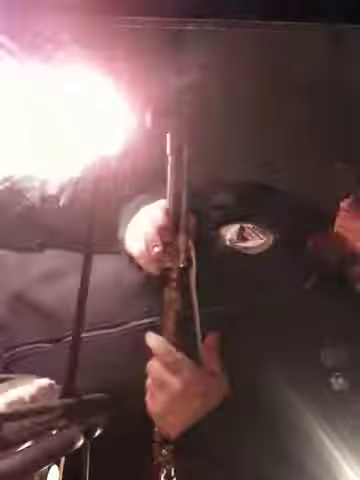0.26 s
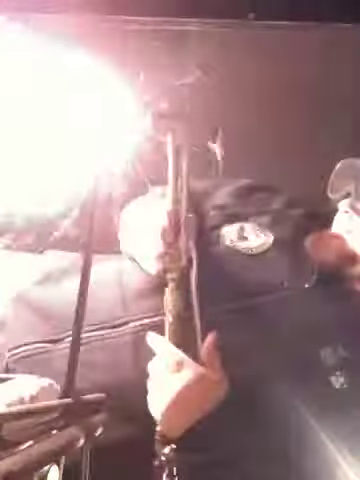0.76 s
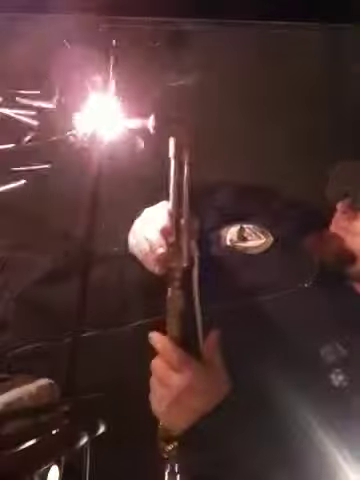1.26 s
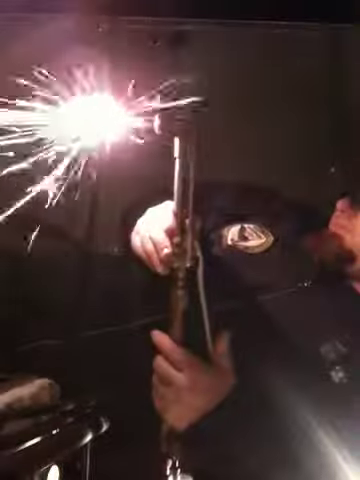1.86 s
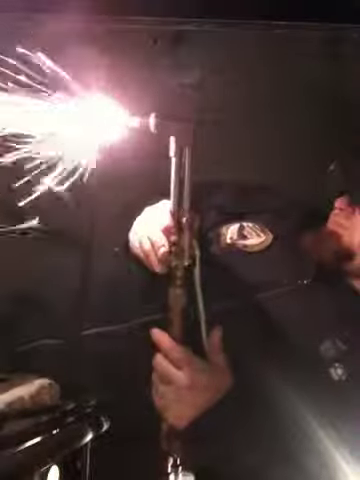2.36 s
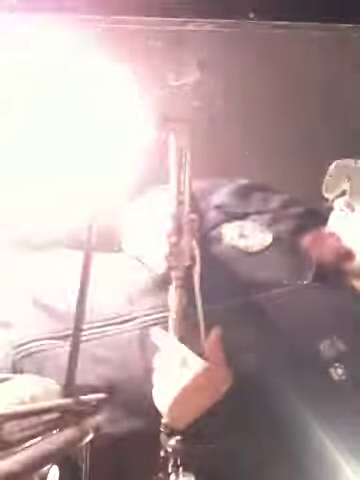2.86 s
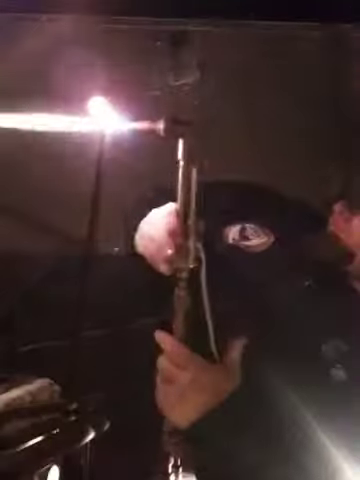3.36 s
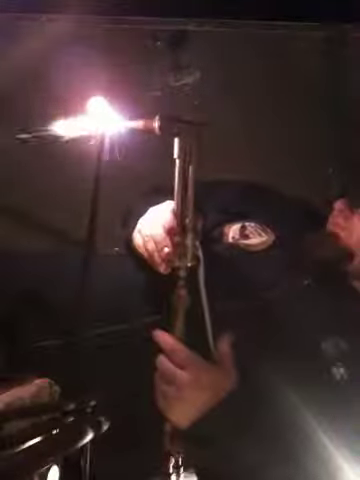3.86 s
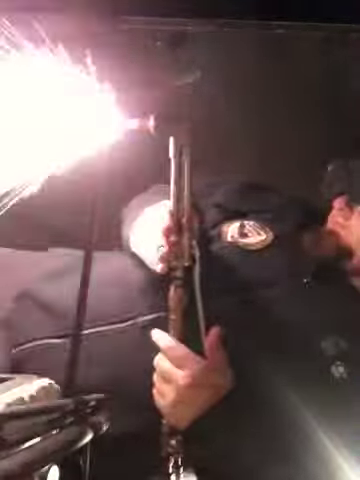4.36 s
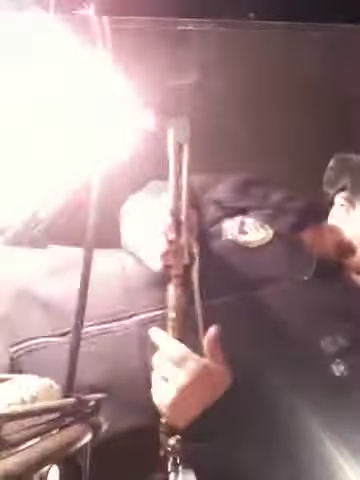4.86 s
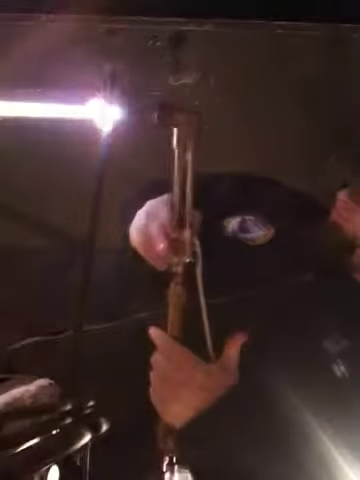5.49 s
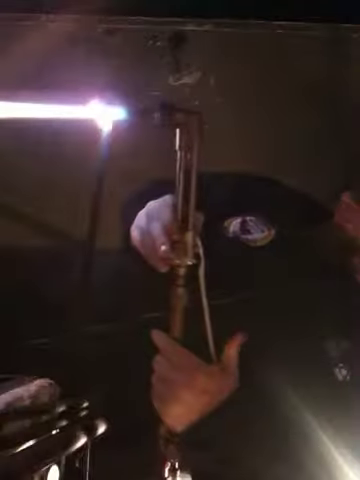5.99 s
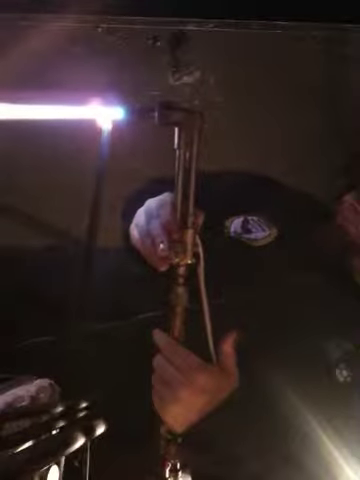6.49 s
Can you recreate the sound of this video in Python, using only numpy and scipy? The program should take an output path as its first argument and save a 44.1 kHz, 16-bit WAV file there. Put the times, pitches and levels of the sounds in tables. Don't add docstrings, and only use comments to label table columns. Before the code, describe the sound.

A gas torch about a metre from a phone microphone cuts metal in a small, hard-walled shop. Rushing, crackly jets of high hiss start and stop suddenly, leaving a soft low flame roar in the gaps. The final long jet breaks through; metal drops with a sharp clank and dull floor thud, sizzles briefly and bounces, then only the loose breathy flame and faint air hiss remain.

```python
import sys
import numpy as np
from scipy import signal
from scipy.fft import rfft, irfft, next_fast_len
from scipy.io import wavfile
from scipy.ndimage import uniform_filter1d

SR = 44100
rng = np.random.default_rng(int(sys.argv[2]) if len(sys.argv) > 2 else 0)


def digitize_waveform(pressure):
    field = np.atleast_2d(pressure).T
    bounded = np.clip(field, -1, 1)
    quanta = np.round(bounded * 32767).astype(np.int16)
    wavfile.write(sys.argv[1], SR, quanta)


def boost(x):
    u = np.asarray(x, float) / 20
    return 10 ** u


N = 296793
PAD_N = next_fast_len(N)
TIME_S = np.arange(N) / SR
HZ = np.fft.rfftfreq(PAD_N, 1 / SR) + 1

# f/Hz, density/dB
HUSH_COLOUR = [(1760, -30), (3000, -1), (3590, -4), (3760, -21), (4410, -19), (8290, -16), (15500, -26)]
# f/Hz, width/Hz, lift or dip/dB
SHOP_MODES = [(250, 26, 4.5), (292.5, 60, -12), (355, 34, 7), (430, 57, -4), (567, 78, 4.5), (689, 38, 7.5),
              (750, 44, -6.5), (842, 30, -4.5), (1077, 160, 4.5), (1139, 19, 3.5), (1266, 130, -1),
              (1705, 23, 7), (1803, 40, 0), (1585, 26, 8.5), (2036, 34, -5.5), (2130, 130, 3.5),
              (2401, 115, -10.5), (2860, 560, 1.5), (3130, 110, 1), (3374, 86, 4.5), (3890, 220, 3),
              (4600, 60, -2), (4950, 150, 3), (6230, 1100, 2), (7240, 130, 3.5), (10700, 200, 1),
              (12900, 490, 1), (13700, 900, -1), (5830, 150, -2)]
# f/Hz, width/Hz, lift or dip/dB
FREE_MODES = [(615, 76, 4.5), (677, 35, -5), (795, 110, 5.5), (880, 50, -8), (990, 18, 2.5),
              (1106, 140, -5), (1235, 37, 3.5), (1510, 50, 2), (1600, 90, -3.5), (1790, 130, 7),
              (2260, 80, -2), (2367, 110, 14), (2530, 60, -8)]
# t/s, roar on the work/dB
FLAME_ROAR = [(0.0, -51), (0.4, -53), (0.72, -61), (1.22, -55.5), (1.42, -51.5), (2.0, -57.5),
              (2.97, -55.5), (3.39, -42), (3.53, -50.5), (3.9, -45), (4.02, -48), (4.6, -49), (4.72, -56.5),
              (4.95, -50), (5.47, -43), (5.6, -53), (6.45, -48), (6.73, -52)]
# f/Hz, density/dB
FLAME_COLOUR = [(15, -73), (25, -37), (129, -16), (229, -1), (288, -6), (355, -4.5), (456, -6), (1080, -1),
                (2400, -10), (3120, -53), (5280, -120)]
# t/s, roar/dB, rumble/dB
FLAME_PUFFS = [(.68, 3, 5), (1.93, 2.5, 2), (1.05, -2.5, 6), (2.34, 5, 0), (2.93, 0, 6.5), (3.45, 0, 6),
               (3.56, 4.5, 3), (4.1, 3.5, 8), (4.52, 6, 3), (4.93, 4, 2), (5.16, 0.5, 11), (5.51, 4.5, 7)]
# t/s, peak level/dB, thud/dB, clank/dB, ring/dB
CONTACTS = [
    (5.5824, -27.5, -9, -12, -10.5),
    (5.5924, -32, -13, -5, -16),
    (5.612, -42.5, -1.5, -20, -10),
    (5.623, -44, 0, -3.5, -7.5),
    (5.8663, -48, -10, -11, -8),
    (5.8850, -56, -8, -14, -6),
    (5.9968, -51, -7, -13, -6),
    (6.5846, -62, 10, -5, -18),
]
# f/Hz, level/dB, t60/s
THUD_MODES = [(217, 5.5, 0.05), (334, 1, 0.12), (590, 7.5, 0.03), (1370, -6, 0.062)]
# f/Hz, level/dB, t60/s
CLANK_MODES = [(3070, -0.5, 0.027), (3300, 0, 0.035), (4600, -8, .02)]
# f/Hz, level/dB, t60/s
RING_MODES = [(7000, -2, 0.044), (7370, 2.5, 0.025), (7950, -11, .02), (9300, -15, .02)]
# t/s, jet flow/dB, aim at the phone/dB
LEVER_SQUEEZES = [
    [(-0.005, -43.5, -10), (0.07, -40, 2.5), (0.36, -41.5, -1), (0.44, -48, 3), (0.645, -47.5, 5),
     (0.75, -50, 2.5), (0.95, -48, 1), (1.1, -50, 1.5), (1.27, -48.5, 6.5)],
    [(1.26, -44.5, 6), (1.45, -45, 9), (1.68, -43, 5.5), (1.745, -41.5, 6.5), (1.81, -47.5, 4.5),
     (1.955, -46, -4.5)],
    [(2.254, -42, -5), (2.34, -42, 3.5), (2.4, -48.5, -1.5), (2.5, -46, 3), (2.6, -45.5, 1),
     (3.07, -49.5, 2.5), (3.16, -38.5, -2.5), (3.29, -39.5, 1.5), (3.42, -42.5, -1.5)],
    [(4.04, -43.5, -1.5), (4.33, -42, 1), (4.57, -42.5, -1.5), (4.68, -51, 2), (4.84, -44.5, 1.5),
     (5.11, -45, 1.5), (5.27, -38.5, 0.5), (5.42, -38.5, 0), (5.49, -41, -1)],
]
# f/Hz, density/dB
JET_COLOUR = [(1180, -38), (2000, -6.5), (2390, 1), (2750, 0.5), (3070, -4.5), (4920, -3), (5840, -4),
              (6520, -0.5), (8010, -1.5), (15500, -4)]
# level/dB, aim follow/(dB/dB), flame roar follow/(dB/dB)
JET_LAYERS = [
    (-6.5, -.5, .3),
    (-3, .5, 0.1),
    (0.5, 0.7, 0),
    (0.5, 1, 0),
    (-2.5, 0.75, -0.24),
]
# t/s, low f/Hz, high f/Hz, level/dB
WIDE_PATCHES = [(0.126, 4650, 5680, -41), (0.217, 9650, 11020, -48), (0.31, 12400, 14470, -43),
                (0.96, 5170, 6290, -53), (1.1, 4570, 5680, -55), (1.101, 7670, 9650, -54),
                (1.379, 11020, 12400, -42), (2.329, 4650, 5680, -44), (2.447, 11020, 12490, -54),
                (2.449, 6890, 8960, -49), (2.631, 13780, 15160, -51), (2.632, 4650, 5680, -49),
                (2.727, 14470, 15850, -52), (2.742, 6200, 8270, -48), (2.935, 5080, 6890, -50),
                (4.304, 6890, 8270, -45), (4.373, 5680, 6890, -46), (4.739, 4570, 8350, -51),
                (4.796, 4220, 5250, -49), (6.138, 4220, 5250, -70)]

HUSH_DB, HUSH_DUCK = -74, .4
WALL_T60_S, WALL_DB = (.15, .3), (-10, -12)
FREE_S, PUFF_S = 5.56, 0.038
ROAR_MID_DB = -50
RUMBLE_DB, RUMBLE_FOLLOWS, RUMBLE_FREE_DB, RUMBLE_DUCK_DB = -59, 0.42, 7, -3.5
EDGE_DB, EDGE_JET_DB, EDGE_FREE_DB = -8.5, 9.5, -2
DRAUGHT_DB, DRAUGHT_FREE_DB, DRAUGHT_DUCK, GUST_DB = -84, -0.5, 0.76, 5.5
SIZZLE_DB, SIZZLE_T60_S = -57, .4
OPEN_S, OPEN_CURVE, TOP_LATE_S, TOP_EARLY_S = 0.038, 0.75, .008, 0.016
SHUT_DB_PER_S = (400, 400, 330, 250)
BLEED_DB, BLEED_DB_PER_S = -33, 14.5
SCALE_DB, SCALE_T60_S = 5.5, 2.6
FRINGE_DB, FRINGE_FREE_DB = (-9, -16, -20.5, -30, -36, -52), -4.5


def colour(points):
    hz, db = np.transpose(points)
    return boost(np.interp(np.log(HZ), np.log(hz), db))


def slope(hz, order):
    return 1 / (1 + np.exp(np.clip(order * np.log(HZ / hz), -99, 99)))


def noise(gain, lo_hz, hi_hz, grit=0.):
    spit = boost(grit * rng.exponential(size=N))
    spectrum = rfft(rng.standard_normal(N) * spit, PAD_N) * gain
    inside = np.sum(abs(spectrum[(HZ > lo_hz) & (HZ < hi_hz)]) ** 2)
    return irfft(spectrum * PAD_N / np.sqrt(2 * inside), PAD_N)[:N]


def split(gain, edges_hz, order, grit=0.):
    cuts = [np.sqrt(a[1] * b[0]) for a, b in zip(edges_hz, edges_hz[1:])]
    below = [0, *(slope(hz, order) for hz in cuts), 1]
    bands = []
    for low, high, edges in zip(below, below[1:], edges_hz):
        share = np.clip(high - low, 0, 1)
        bands.append(noise(gain * np.sqrt(share), *edges, grit))
    return bands


def walk(rate):
    k = int(SR / rate)
    held = np.repeat(rng.standard_normal(N // k + 1), k)
    return uniform_filter1d(uniform_filter1d(held, k), k)[:N]


def play(table):
    s, *columns = np.transpose(table)
    return [np.interp(TIME_S, s, c) for c in columns]


def shop(modes):
    return boost(sum(db / (1 + (2 * (HZ - hz) / width) ** 2) for hz, width, db in modes))


def walls(x):
    t = np.arange(16384) / SR
    bright, dull = rng.standard_normal((2, len(t))) * (t > .002)
    bright = signal.sosfilt(signal.butter(2, 2500, "high", fs=SR, output="sos"), bright)
    dull = signal.sosfilt(signal.butter(2, (450, 2500), "band", fs=SR, output="sos"), dull)
    echo = np.zeros(len(t))
    for tail, t60, db in zip((bright, dull), WALL_T60_S, WALL_DB):
        tail = tail * np.exp(-np.log(1000) * t / t60)
        echo = echo + boost(db) * tail / np.sqrt(np.sum(tail ** 2))
    echo[0] = 1
    response = rfft(echo, PAD_N)
    response = response / np.sqrt(uniform_filter1d(abs(response) ** 2, size=900))
    return irfft(rfft(x, PAD_N) * response, PAD_N)[:N]


def hush():
    level_db = HUSH_DB - HUSH_DUCK * (play(FLAME_ROAR)[0] - ROAR_MID_DB) + 1.2 * walk(17)
    gain = colour(HUSH_COLOUR[:-1]) * np.sqrt(1 - slope(3300, order=6))
    return boost(level_db) * noise(gain, 4000, 18000)


def freed():
    return np.clip((TIME_S - FREE_S) / .04, 0, 1)


def puffs():
    return sum(np.outer(db, np.exp(-((TIME_S - s) / PUFF_S) ** 2)) for s, *db in FLAME_PUFFS)


def flame(flow):
    (roar_db,), free = play(FLAME_ROAR), freed()
    blowing = flow / (flow + boost(-51))
    rumble_db = RUMBLE_DB + RUMBLE_FOLLOWS * (roar_db - ROAR_MID_DB)
    rumble_db = rumble_db + RUMBLE_FREE_DB * free + RUMBLE_DUCK_DB * blowing
    roar_db, rumble_db = np.array([roar_db, rumble_db]) + puffs()
    edge_db = EDGE_DB + EDGE_JET_DB * blowing + EDGE_FREE_DB * free
    draught_db = DRAUGHT_DB + DRAUGHT_FREE_DB * free - DRAUGHT_DUCK * 20 * np.log10(1 + flow / boost(-45))
    gain = colour(FLAME_COLOUR[:-1]) * shop(SHOP_MODES) * np.sqrt(slope(3280, order=12))
    edges_hz = (40, 125), (150, 450), (500, 1300), (1400, 2400)
    on_work = np.array(split(gain, edges_hz, order=10))
    in_air = np.array(split(gain * shop(FREE_MODES), edges_hz, order=10))
    draught, rumble, roar, edge = np.sqrt(1 - free) * on_work + np.sqrt(free) * in_air
    low = boost(draught_db + GUST_DB * walk(12)) * draught + boost(rumble_db + 1.7 * walk(6)) * rumble
    return low + boost(roar_db + 1.24 * walk(12)) * (roar + boost(edge_db + 0.22 * walk(25)) * edge)


def sizzle():
    t = TIME_S - CONTACTS[0][0]
    hiss = noise(np.sqrt(1 - slope(5000, order=6)), 5000, 16000, grit=2.5)
    return boost(SIZZLE_DB + 2.1 * walk(30)) * hiss * (t > 0) * boost(-60 * abs(t) / SIZZLE_T60_S)


def drops():
    out, t = np.zeros(N), np.arange(8192) / SR
    edge = signal.butter(3, (6300, 10200), "band", fs=SR, output="sos")
    crack_decay = np.exp(-t / 0.0027) + 0.28 * np.exp(-t / .015)
    for s, peak_db, *parts_db in CONTACTS:
        crack = signal.sosfilt(edge, rng.standard_normal(8192)) * crack_decay
        hit = boost(parts_db[2] + 4) * crack
        for part_db, modes in zip(parts_db, (THUD_MODES, CLANK_MODES, RING_MODES)):
            for hz, db, t60 in modes:
                decay = np.exp(-np.log(1000) * t / t60)
                hit = hit + boost(part_db + db - 2.5) * np.sin(2 * np.pi * hz * t) * decay
        start = int(s * SR)
        out[start:start + 8192] += boost(peak_db) * hit[:N - start]
    return signal.sosfilt(signal.butter(4, 170, "high", fs=SR, output="sos"), out)


def lever():
    flows, aim = np.zeros((2, N)), np.zeros(N)
    for rows, shut in zip(LEVER_SQUEEZES, SHUT_DB_PER_S):
        flow_db, aim_db = play(rows)
        open_s = TIME_S - rows[0][0] - np.array([[0], [TOP_LATE_S]])
        opened = np.clip(open_s / OPEN_S, 0, 1) ** OPEN_CURVE
        shut_s = np.clip(TIME_S - rows[-1][0] + np.array([[0], [TOP_EARLY_S]]), 0, 9)
        seep = boost(BLEED_DB - BLEED_DB_PER_S * shut_s[0])
        flows = flows + opened * boost(flow_db) * (boost(-shut * shut_s) + seep)
        aim = np.where(TIME_S > rows[0][0] - .01, aim_db, aim)
    return *flows, aim


def jet(flow, late, aim_db):
    (roar_db,) = play(FLAME_ROAR)
    blast_db, kerf_db, shear_db, thin_db, spray_db = (
        db + by_aim * aim_db + by_roar * (roar_db - ROAR_MID_DB) for db, by_aim, by_roar in JET_LAYERS)
    gain = colour(JET_COLOUR[:-1]) * shop(SHOP_MODES) * np.sqrt(1 - slope(2440, order=12))
    edges_hz = (2500, 3000), (3100, 4400), (4500, 5800), (5900, 8000), (8500, 12800), (13000, 15600)
    bands = blast, kerf, core, shear, thin, spray = split(gain, edges_hz, order=16, grit=.8)
    skirt = np.sqrt(slope(2000, order=12) * (1 - slope(1300, order=4)))
    wash = boost(-11.5) * noise(shop(SHOP_MODES) * skirt, 900, 2400)
    flutter_db = 0.55 * walk(14) + .5 * walk(40) + .35 * walk(150)
    scale_db = SCALE_DB * boost(-60 * TIME_S / SCALE_T60_S)
    tip = late * boost(0.36 * walk(20)) * (boost(thin_db) * thin + boost(spray_db + scale_db) * spray)
    tip = tip + np.sqrt(flow * late) * boost(shear_db + 0.67 * walk(6)) * shear
    body = flow * (boost(blast_db) * blast + boost(kerf_db + 0.65 * walk(6)) * kerf + core + wash)
    fringe = sum(boost(db) * band for db, band in zip(FRINGE_DB, bands))
    fringe = boost(roar_db + FRINGE_FREE_DB * freed()) * fringe
    return boost(flutter_db) * (body + tip + fringe)


def scene():
    flow, late, aim_db = lever()
    sources = jet(flow, late, aim_db) + flame(flow) + drops() + sizzle()
    torch = walls(sources) + hush()
    return np.array([torch, torch])


def thin_treble(x, dead, share, faint_db):
    n, k = np.arange(2048)[:, None] + .5, np.arange(1024) + .5
    lapped = np.sin(np.pi * n / 2048) * np.cos(np.pi / 1024 * (n + 512) * k) / np.sqrt(512)
    padded = np.pad(x, (1517, 4096))
    count = len(padded) // 1024 - 1
    lines = padded[1024 * np.arange(count)[:, None] + np.arange(2048)] @ lapped
    patch = uniform_filter1d(uniform_filter1d(lines ** 2, size=7, axis=1), size=3, axis=0)
    band = uniform_filter1d(patch, size=64, axis=1)
    treble = np.clip((k * SR / 2048 - 1500) / 8500, 0, 1)
    power = np.mean(lines[:, 400:700] ** 2, axis=1, keepdims=True)
    faint = 1 / (1 + (power / boost(2 * faint_db)) ** 2)
    strong_line = lines ** 2 > dead * faint * treble ** 2 * band
    strong_patch = patch > share * (.85 + .45 * faint) * treble * band
    frames = (lines * strong_line * strong_patch) @ lapped.T
    return (frames[1:, :1024] + frames[:-1, 1024:]).ravel()[493:493 + N]


def wide_patches():
    side, hz = np.zeros(N), np.fft.rfftfreq(2048, 1 / SR)
    swell = np.sin(np.pi * np.arange(2048) / 2048)
    for s, lo_hz, hi_hz, db in WIDE_PATCHES:
        band = irfft(rfft(rng.standard_normal(2048)) * ((hz > lo_hz) & (hz < hi_hz)))
        start = 531 + 1024 * round((s * SR - 531) / 1024 - 1)
        side[start:start + 2048] += boost(db) * band / np.std(band) * swell
    return side * np.array([[1], [-1]])


def roll_off(x):
    return signal.sosfilt(signal.butter(12, 16500, fs=SR, output="sos"), x)


def record(dry):
    top_cut = np.sqrt(slope(15750, order=1500))
    cut = irfft(rfft(dry[0], PAD_N) * top_cut, PAD_N)[:N]
    thinned = thin_treble(cut, dead=.3, share=.53, faint_db=-62)
    return roll_off(thinned + wide_patches())


dry = scene()
out = record(dry)
digitize_waveform(out)
```